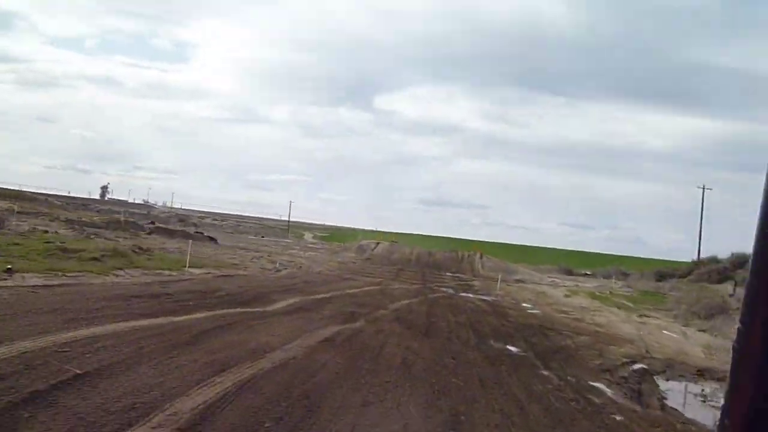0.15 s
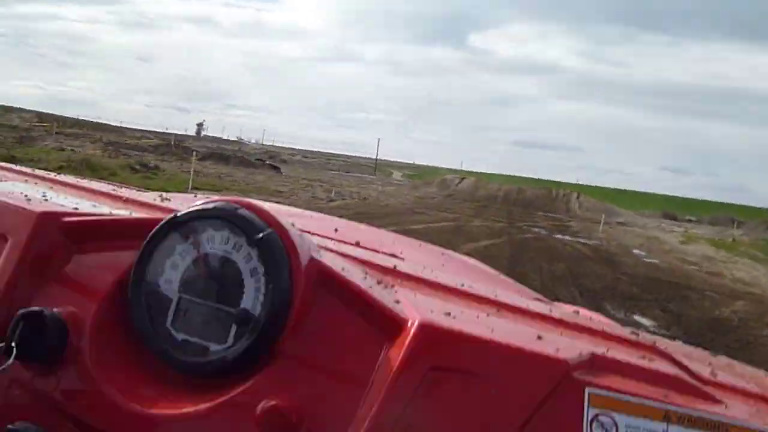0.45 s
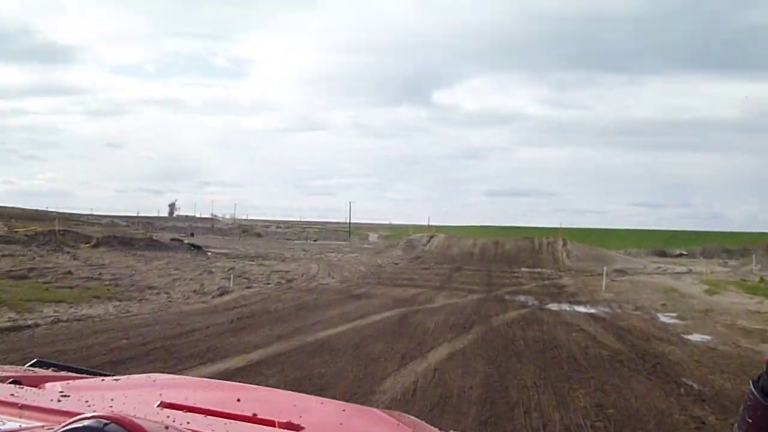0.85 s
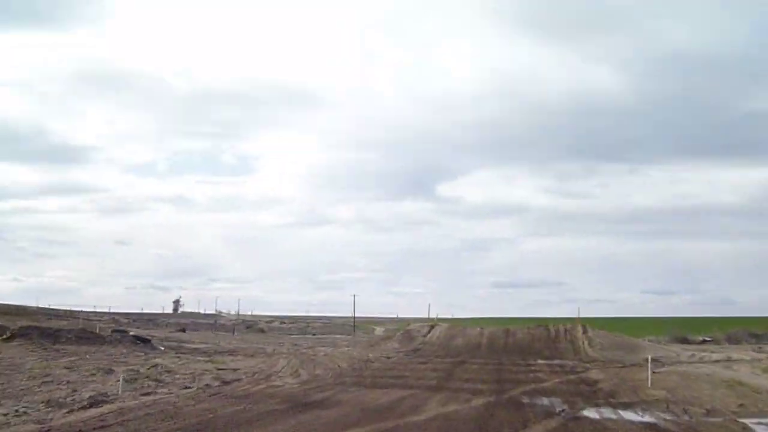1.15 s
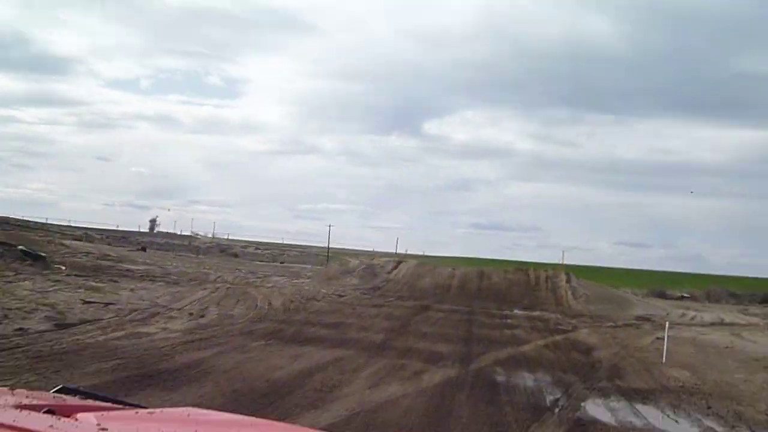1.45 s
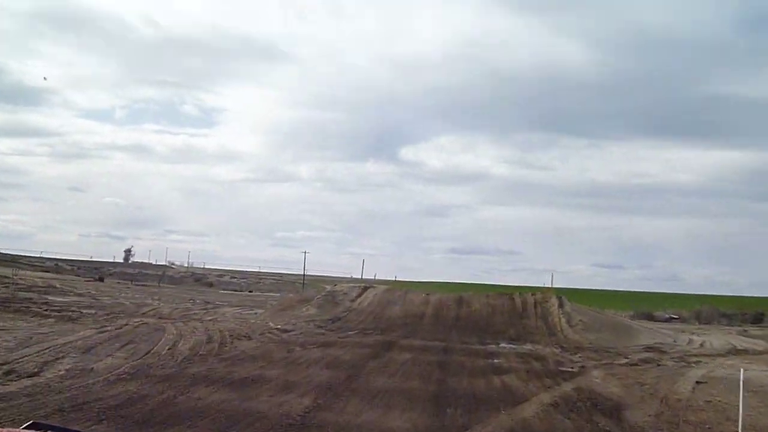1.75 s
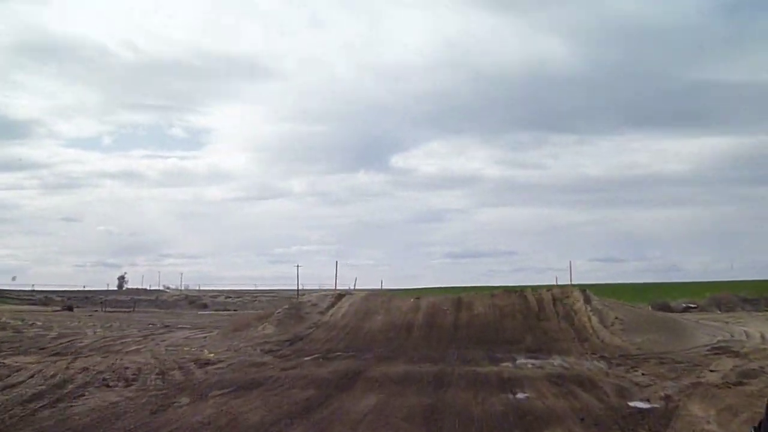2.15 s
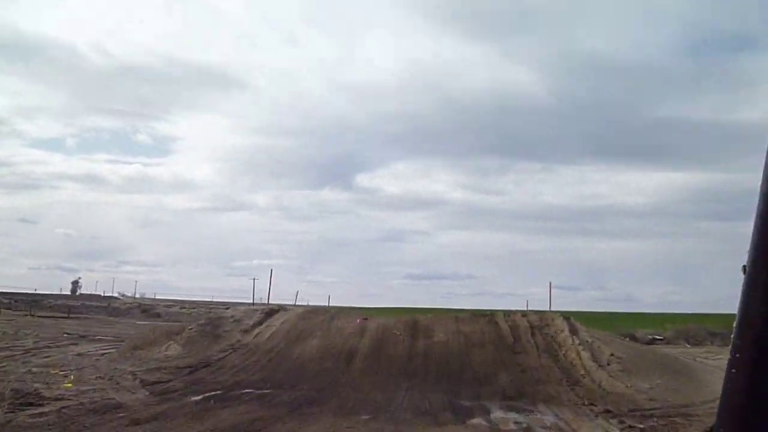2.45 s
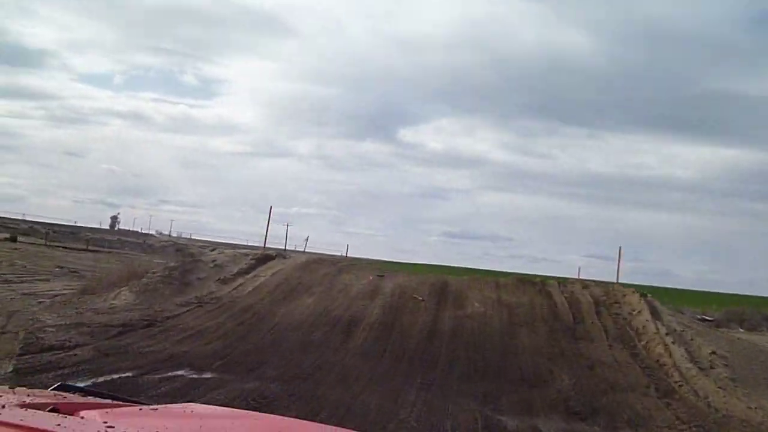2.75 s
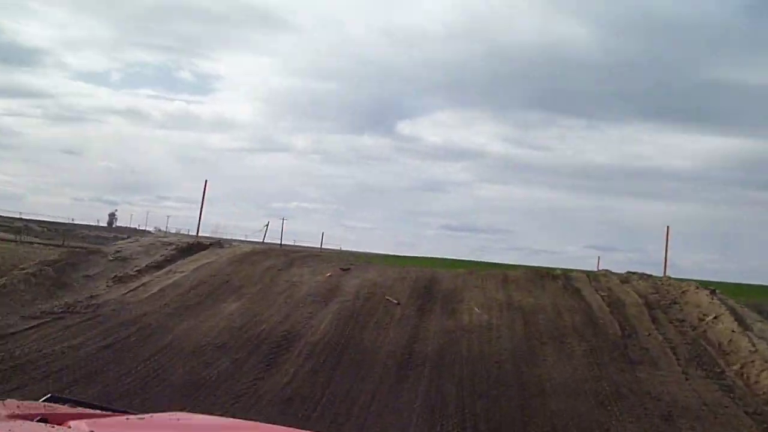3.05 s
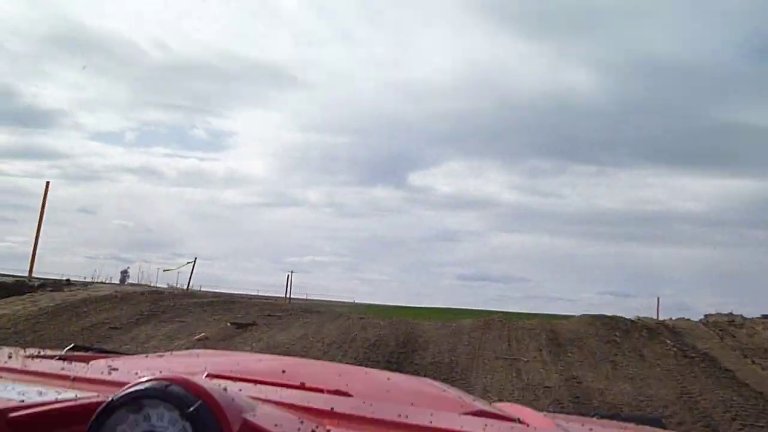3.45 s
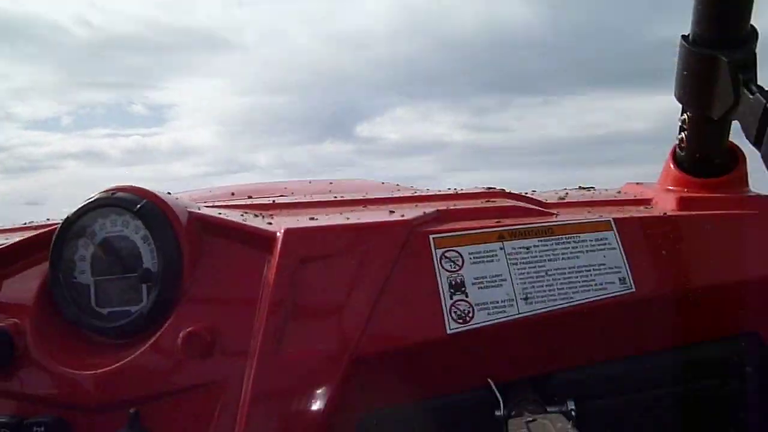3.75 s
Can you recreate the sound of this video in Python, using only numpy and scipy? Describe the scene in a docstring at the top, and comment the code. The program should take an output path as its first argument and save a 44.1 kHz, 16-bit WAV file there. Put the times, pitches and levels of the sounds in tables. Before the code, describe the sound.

A small off-road buggy engine drones from the seat, low and raspy, starting fairly high, sagging until about 1.9 s, holding low, then climbing from 3.1 to 3.7 s. Tyres rumble and thud on dirt with pattering grit and faint driveline ticking. Wet dirt swishes around 0.4 and 1.3 s; suspension knocks scatter throughout. Stones tap hard near 2.9 s, then ground noise thins at the crest, briefly returning around 3.4 s.

```python
"""An engine drone eases off, then picks up over a crest: a side-by-side buggy on dirt, heard from the seat.
Engine orders are sines locked to one cycle count; rasp and clatter are noise paced by the same cycles.
Tyres rumble and thud, dirt patters, the driveline ticks: filtered noise and random impacts.
Wet dirt rushes up in swashes; bumps knock the frame and stones tap the underside.
Ground noise drops as the buggy goes light on the crest; a limiter holds the peaks."""
import sys
import numpy as np
from scipy import signal
from scipy.fft import rfft, irfft
from scipy.io import wavfile
from scipy.ndimage import uniform_filter1d, minimum_filter1d, map_coordinates

SR = 44100
rng = np.random.default_rng(int(sys.argv[2]) if len(sys.argv) > 2 else 0)


def master(y):
    """Save y as 16-bit WAV."""
    cut = np.clip(np.atleast_2d(y).T, -1, 1)
    pcm = np.round(cut * 32767)  # scale
    wavfile.write(sys.argv[1], SR, pcm.astype(np.int16))


N = 171990


def undb(db):
    """Decibels to gain."""
    return 10 ** (np.asarray(db) / 20)


def curve(table, axis=1):
    """One column of a table, joined by straight lines in time."""
    rows = np.array(table)
    return np.interp(np.arange(N) / SR, rows[:, 0], rows[:, axis])


def unit(x):
    """Scale to rms 1."""
    return x / np.sqrt(np.mean(x ** 2))


def response(points, hz):
    """Gain of a (frequency, dB) shape at the given frequencies, interpolated over log frequency."""
    rows = np.array(points)
    return undb(np.interp(np.log(hz + 1), np.log(rows[:, 0]), rows[:, 1]))


def colour(x, points):
    """Minimum-phase filter of unit energy: the table sets its spectral shape, not its level."""
    size = 4096
    log_gain = np.log(response(points, np.arange(size // 2 + 1) * SR / size))
    cepstrum = irfft(log_gain)
    # fold onto positive time: causal ring
    cepstrum[1:size // 2] *= 2
    cepstrum[size // 2 + 1:] = 0
    ring = irfft(np.exp(rfft(cepstrum)))
    return signal.fftconvolve(x, ring / np.linalg.norm(ring))[:N]


def walk(hz):
    """Smooth random wander with a spread near 1, hz random points per second."""
    points = rng.standard_normal(1024)
    return map_coordinates(points, [np.arange(N) / SR * hz], order=2, mode="mirror")


def impacts(per_s, scatter_db):
    """Randomly timed pushes of scattered size and random sign, rms 1."""
    size = undb(scatter_db * np.clip(rng.standard_normal(N), -2, 2))
    sign = np.sign(rng.standard_normal(N))
    return unit(size * sign * (rng.random(N) < per_s / SR))


def fade(age_s, decay_s):
    """Sudden start at age 0, then an exponential decay."""
    return (age_s >= 0) * np.exp(-np.abs(age_s) / decay_s)


def taps(table):
    """One single-sample push for each (time, dB) row."""
    force = np.zeros(N)
    for at_s, db in table:
        force[int(at_s * SR)] = -undb(db)
    return force


WAVER_HZ = 15
# engine speed: (time [s], working cycles per second [Hz])
SPEED = [(0, 49.58), (.22, 50.9), (.46, 51.54), (.62, 48.61), (.85, 47.52), (1.02, 43.9), (1.25, 45.49),
         (1.62, 41.66), (1.72, 38.45), (1.85, 35.81), (1.97, 39.38), (2.22, 40.63), (2.56, 39.04),
         (2.8, 39.31), (3.12, 40.45), (3.3, 42.75), (3.47, 45.29), (3.58, 50.47), (3.66, 51.9), (3.9, 50)]
SPEED_JITTER = .003  # fraction of speed


def engine():
    """All engine parts share one jittered cycle count, so they glide together with speed."""
    hz = curve(SPEED) * (1 + SPEED_JITTER * walk(WAVER_HZ))
    cycles = np.cumsum(hz) / SR
    orders = booming_orders(cycles) + weak_orders(hz, cycles)
    return np.sqrt(2) * orders + rasp(cycles) + clatter(hz, cycles)


# booming orders, rms: (time [s], third order level [dB], fourth [dB], sixth [dB])
DRONE = [(0, -46.5, -37, -31.5), (.24, -29, -18.5, -27), (.4, -26.5, -31.5, -26.5), (.55, -27, -25, -28),
         (.85, -30, -23, -27), (1.02, -28.5, -27.5, -32.5), (1.3, -28.5, -32, -26.5),
         (1.59, -38, -21, -31.5), (1.7, -26.5, -34, -34.5), (1.86, -25.5, -23.5, -38),
         (2.0, -28.5, -25.5, -30.5), (2.22, -30, -21, -31), (2.39, -25.5, -25.5, -33.5),
         (2.5, -36.5, -34.5, -34), (2.77, -31, -19.5, -33.5), (2.86, -24.5, -32, -39.5),
         (3.02, -32.5, -33.5, -35), (3.27, -41.5, -26.5, -33.5), (3.53, -22, -25, -32.5),
         (3.65, -29.5, -22.5, -27.5), (3.9, -51, -22.5, -28)]
WAVER_DB = 1
# rough ground shakes level and phase
SHAKE_DB, SHAKE_CYCLES, SHAKE_HZ = 1.2, .03, 28


def booming_orders(cycles):
    """Firings drone through the body at three multiples of the cycle rate, shaken by the ground."""
    drone, jolting = 0, contact()
    for axis, order in enumerate((3, 4, 6), start=1):
        phase_shake = SHAKE_CYCLES * jolting * walk(SHAKE_HZ)
        tone = np.sin(2 * np.pi * (order * cycles + rng.random() + phase_shake))
        level_shake_db = WAVER_DB * walk(WAVER_HZ) + SHAKE_DB * jolting * walk(SHAKE_HZ)
        drone = drone + undb(curve(DRONE, axis) + level_shake_db) * tone
    return drone


LOAD_REF_DB, LOAD_FOLLOW = -23, 0.56  # fourth-order level at unity load gain; dB per dB


def load():
    """Engine load as a gain, following the fourth booming order."""
    return undb(LOAD_FOLLOW * (curve(DRONE, axis=2) - LOAD_REF_DB))


# weak orders, the highest a faint gear whine: (multiple of cycle rate, level before load and body [dB])
ORDERS = [(1, -36.5), (2, -30), (5, -36.5), (7, -45.5), (8, -46), (11, -52.5), (13, -48), (15, -51),
          (43, -72.5)]
# body transmission: (frequency [Hz], gain [dB])
BODY = [(40, -8.5), (49, 1), (78, -8.5), (100, -1.5), (500, 0), (590, 4.5), (680, -4), (780, -2)]
WEAK_WAVER_DB, WEAK_PHASE_CYCLES = 2.5, 0.17


def weak_orders(hz, cycles):
    """Wavering tones follow the load; the body passes them best near 50 and 600 Hz."""
    drone, load_gain = 0, load()
    for order, db in ORDERS:
        wander_cycles = WEAK_PHASE_CYCLES * walk(WAVER_HZ)
        tone = np.sin(2 * np.pi * (order * cycles + rng.random() + wander_cycles))
        level = undb(db + WEAK_WAVER_DB * walk(WAVER_HZ)) * response(BODY, order * hz)
        drone = drone + load_gain * level * tone
    return drone


# combustion rasp shape: (frequency [Hz], relative level [dB])
RASP = [(60, -20.5), (130, 7), (280, 5.5), (420, -14.5), (650, -13), (1000, -24.5), (2000, -32),
        (4000, -55), (8000, -48.5)]
RASP_DB, RASP_DECAY_PUFFS = -34, 0.63  # level at unity load gain; decay in puff periods


def rasp(cycles):
    """Combustion noise puffs out twice a cycle, each puff decaying; level follows load."""
    puffs = np.exp(-(2 * cycles % 1) / RASP_DECAY_PUFFS) * rng.standard_normal(N)
    return undb(RASP_DB) * load() * unit(colour(puffs, RASP))


# valve and gear clatter shape: (frequency [Hz], relative level [dB])
CLATTER = [(300, -6), (600, 2), (880, -2.5), (1050, -5.5), (1700, -17.5), (2500, -21.5), (8000, -51)]
CLATTER_DB, CLATTER_AT_HZ, CLATTER_DB_PER_HZ = -48.5, 51.2, 0.3  # level at that cycle rate; slope


def clatter(hz, cycles):
    """Valves and gears repeat one ragged pattern every cycle, louder as the engine speeds up."""
    size = 512
    ragged = rng.standard_normal(size)
    pattern = np.interp(cycles % 1, np.arange(size) / size, ragged, period=1)
    return unit(colour(pattern, CLATTER)) * undb(CLATTER_DB + CLATTER_DB_PER_HZ * (hz - CLATTER_AT_HZ))


# tyre rumble: (time [s], level [dB])
GROUND = [(0, -23), (.35, -21.5), (.65, -25), (.94, -22), (.985, -26), (1.06, -22), (1.3, -19), (1.42, -23),
          (1.7, -22.5), (2.1, -24.5), (2.5, -21), (2.95, -22), (3.01, -32.5), (3.28, -29), (3.38, -21),
          (3.55, -24), (3.68, -28.5), (3.9, -33)]
# rumble shape: (frequency [Hz], relative level [dB])
RUMBLE = [(20, -18.5), (30, -23), (44, -9), (62, -7), (80, -6.5), (105, 2.5), (150, 0), (230, -2.5),
          (330, -7.5), (480, -13.5), (700, -21), (1100, -39.5), (2500, -55.5), (8000, -76)]
THUDS_PER_S, THUD_SCATTER_DB, THUD_SHARE = 110, 2.5, 0.56  # share of power at full contact


def tyres():
    """Clods thud through the tyres into the frame over a rolling rumble."""
    share = THUD_SHARE * contact()
    thuds = np.sqrt(share) * impacts(THUDS_PER_S, THUD_SCATTER_DB)
    rolling = np.sqrt(1 - share) * rng.standard_normal(N)
    return colour(thuds + rolling, RUMBLE) * undb(curve(GROUND))


FULL_CONTACT_DB = -24  # rumble level at which the tyres bear the whole weight


def contact():
    """How firmly the tyres press on the track, 0-1, from the rumble level."""
    return np.minimum(1, undb(curve(GROUND) - FULL_CONTACT_DB))


# dirt spray: (time [s], level [dB])
SPRAY = [(0, -48.5), (.3, -45), (.55, -41.5), (.82, -41), (1, -45), (1.25, -45.5), (1.32, -44),
         (1.53, -44.5), (1.8, -48.5), (2.25, -48), (2.5, -43.5), (2.8, -42), (2.86, -49), (2.95, -51),
         (3.01, -62), (3.31, -55), (3.39, -48.5), (3.55, -44.5), (3.75, -58), (3.9, -49.5)]
# dirt shape: (frequency [Hz], relative level [dB])
DIRT = [(250, -23), (500, -1.5), (800, 4.5), (1100, -2), (1500, -7), (2200, -19), (3500, -28),
        (8000, -43.5)]
GRAINS_PER_S, GRAIN_SCATTER_DB = 1100, 0.5


def spray():
    """Loose dirt patters on the underside as dense random impacts."""
    return colour(impacts(GRAINS_PER_S, GRAIN_SCATTER_DB), DIRT) * undb(curve(SPRAY))


# driveline: (time [s], tick rate [Hz], level before TICK_TRIM_DB [dB])
TICKS = [(0, 51.7, -57.5), (.4, 55.77, -62), (.62, 60.33, -56), (.9, 57.52, -58.5), (1.15, 56.58, -62),
         (1.35, 57.92, -55.5), (1.51, 57.3, -54), (1.78, 55.99, -61.5), (2.05, 53.04, -60),
         (2.45, 55.98, -57), (2.8, 51.8, -56), (2.98, 50.5, -73), (3.4, 48.4, -67), (3.9, 47.1, -76)]
# tick shape: (frequency [Hz], relative level [dB])
TICK_COLOUR = [(800, -18), (2000, 6.5), (3300, 6), (5300, 4.5), (6800, -1.5), (8000, -19.5)]
TICK_DECAY_S, BOUNCE_DELAY_S, BOUNCE_DB, TICK_TRIM_DB = .0011, .0028, 0.5, -3
TICK_SCATTER_DB, TICK_GRAINS_PER_S, TICK_JITTER_TURNS = 1.8, 7000, .012


def driveline():
    """A short, gritty scrape once per turn of the shaft, never quite on time, bouncing once."""
    hz = curve(TICKS)
    turns = np.cumsum(hz) / SR + TICK_JITTER_TURNS * walk(SHAKE_HZ)
    sizes = undb(TICK_SCATTER_DB * rng.standard_normal((512, 2)))
    scrape_size, bounce_size = sizes[turns.astype(int)].T
    age_s = turns % 1 / hz
    scrape = scrape_size * fade(age_s, TICK_DECAY_S)
    bounce = bounce_size * undb(BOUNCE_DB) * fade(age_s - BOUNCE_DELAY_S, TICK_DECAY_S)
    grit = impacts(TICK_GRAINS_PER_S, TICK_SCATTER_DB)
    ticks = unit(colour((scrape + bounce) * grit, TICK_COLOUR))
    return ticks * undb(curve(TICKS, axis=2) + TICK_TRIM_DB)


# ploughing wet, soft dirt: (start [s], length [s], level [dB])
SWASHES = [(0.367, 0.234, -40), (1.26, .13, -33.5), (1.369, 0.13, -37), (3.344, 0.081, -40)]
# swash shape: (frequency [Hz], relative level [dB])
SWASH_COLOUR = [(200, -14.5), (450, 5.5), (850, 3), (1350, -5.5), (2000, -16.5), (8000, -56)]
SWASH_ATTACK_S, SWASH_RELEASE_S, SWASH_GRAINS_PER_S = 0.055, .04, 2100


def swashes():
    """Wet dirt swells against the wheel wells in a dense, gritty rush."""
    t = np.arange(N) / SR
    swell = np.zeros(N)
    for at_s, length_s, db in SWASHES:
        rise = np.clip((t - at_s) / SWASH_ATTACK_S, 0, 1)
        fall = np.clip((at_s + length_s - t) / SWASH_RELEASE_S + .5, 0, 1)  # centred on the end
        swell += undb(db) * rise * fall
    return swell * colour(impacts(SWASH_GRAINS_PER_S, GRAIN_SCATTER_DB), SWASH_COLOUR)


# suspension knocks: (time [s], strength before push and rattle gains [dB])
KNOCKS = [(.377, -17.5), (.425, -19), (0.823, -17.5), (0.925, -19.5), (1.075, -20.5), (1.169, -12.5),
          (1.404, -16.5), (1.598, -21.5), (1.713, -17.5), (2.079, -24.5), (2.423, -17.5), (2.496, -18),
          (2.53, -20.5), (2.695, -19), (2.913, -16.5), (3.442, -25)]
# knock shape: (frequency [Hz], relative level [dB])
KNOCK_COLOUR = [(60, -9.5), (150, -1), (380, 10.5), (600, 1.5), (1000, -10), (1600, -22), (2500, -36),
                (8000, -57)]
RATTLE_DECAY_S, RATTLE_DB, KNOCK_PUSH_DB = 0.014, -6, 14.5


def suspension():
    """Each bump knocks the frame and sets off a dull, quickly dying rattle."""
    t = np.arange(N) / SR
    envelope = sum(undb(db) * fade(t - at_s, RATTLE_DECAY_S) for at_s, db in KNOCKS)
    rattle = envelope * rng.standard_normal(N)
    return colour(undb(KNOCK_PUSH_DB) * taps(KNOCKS) + undb(RATTLE_DB) * rattle, KNOCK_COLOUR)


# stones against the chassis: (time [s], strength [dB])
STONES = [(.378, -2), (2.778, -6), (2.918, -0.5), (2.967, 3)]
# stone shape: (frequency [Hz], relative level [dB])
STONE_COLOUR = [(100, 5), (400, 18.5), (700, 4), (1500, -13), (4000, -31.5), (8000, -42.5)]


def stones():
    """Single hard taps on the underside, each ringing the filter once."""
    return colour(taps(STONES), STONE_COLOUR)


def scene():
    """Engine, running gear and blows, all close to the seat."""
    running_gear = tyres() + spray() + driveline()
    blows = swashes() + suspension() + stones()
    return (engine() + running_gear + blows)[None]


# microphone hiss shape: (frequency [Hz], relative level [dB])
HISS = [(500, -1.5), (3000, 4.5), (6000, 2.5), (7500, 2), (8500, -14)]
HISS_DB, WHINE_DB, WHINE_HZ = -65.5, -84, 7530  # rms levels; whine is electrical
LIMIT_DB, LIMIT_HOLD_S, LIMIT_KNEE = -10, 0.013, 18  # knee: exponent, higher is harder
CONVERTER_OFFSET, FADE_S, TOP_HZ = .0147, .004, 8100  # offset re full scale; end fade; treble cutoff


def record(dry):
    """Limits the peaks, adds hiss, a thin whine and a small offset from zero, then cuts the treble."""
    t = np.arange(N) / SR
    hold = int(LIMIT_HOLD_S * SR)
    wanted = (1 + (np.abs(dry) / undb(LIMIT_DB)) ** LIMIT_KNEE) ** (-1 / LIMIT_KNEE)
    gain = uniform_filter1d(minimum_filter1d(wanted, hold), hold)
    hiss = undb(HISS_DB) * colour(rng.standard_normal(N), HISS)
    whine = undb(WHINE_DB) * unit(np.sin(2 * np.pi * WHINE_HZ * t))
    end_fade = np.minimum(1, (t[-1] - t) / FADE_S)
    sound = (gain * dry + hiss + whine + CONVERTER_OFFSET) * end_fade
    lowpass = signal.cheby1(12, .1, TOP_HZ, fs=SR, output="sos")
    return signal.sosfilt(lowpass, sound)


dry = scene()
out = record(dry)
master(out)
```